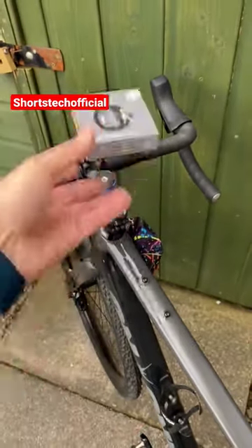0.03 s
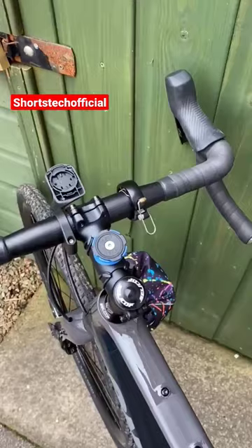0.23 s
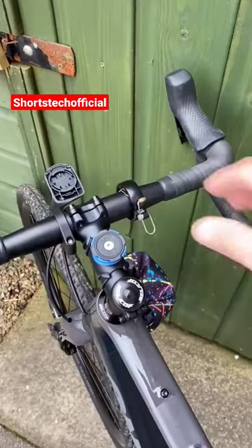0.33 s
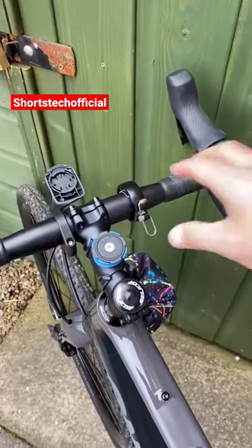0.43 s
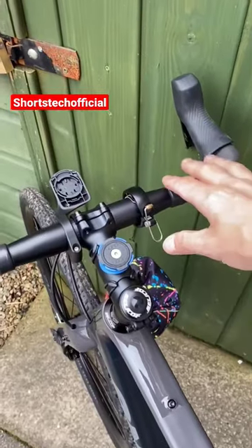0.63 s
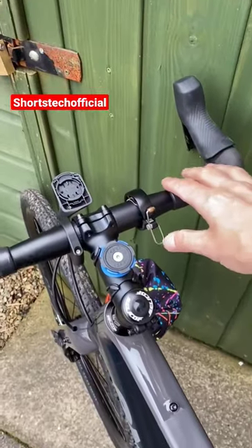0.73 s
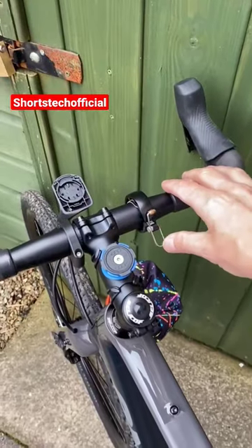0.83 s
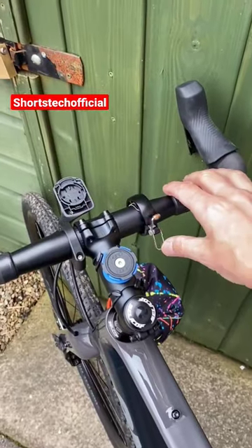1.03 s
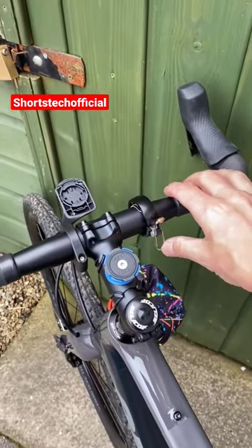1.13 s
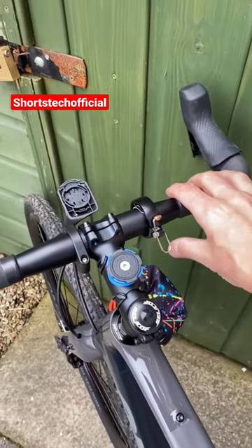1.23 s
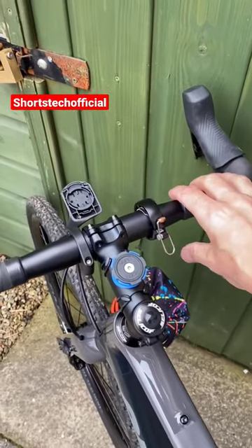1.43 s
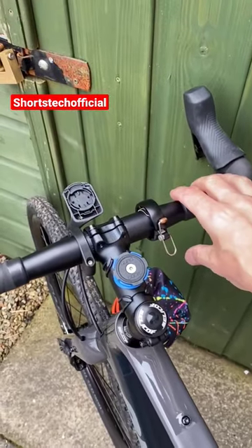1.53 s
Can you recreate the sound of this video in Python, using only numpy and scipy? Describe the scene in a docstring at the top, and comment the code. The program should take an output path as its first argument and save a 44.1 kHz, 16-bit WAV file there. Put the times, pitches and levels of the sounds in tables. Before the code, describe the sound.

A small bicycle bell rings once outdoors, over a faint, steady rumble. First, soft low bumps and sleeve rustle touch the microphone, ending in a hard, hollow knock close by at about 0.2 seconds. A quiet second follows, with a hand barely brushing the handlebar. At about 1.3 seconds the bell's hammer strikes with a bright click, and two high, pure tones ring on to the end.

```python
"""A bicycle by a wooden shed, over a faint, steady outdoor rumble.
0-0.2 s: the camera is jostled; low bumps, sleeve rustle. 0.22 s: a hard, hollow knock close by.
0.4-1.1 s: a hand faintly brushes the handlebar tape.
1.28 s: a thumb releases the bell's sprung hammer. It clacks on the small metal ring,
which sings on in two high, pure tones while its other modes fade."""
import sys
import numpy as np
from scipy import signal
from scipy.fft import rfft, irfft, next_fast_len
from scipy.io import wavfile
from scipy.ndimage import map_coordinates

SR = 44100
rng = np.random.default_rng(int(sys.argv[2]) if len(sys.argv) > 2 else 0)


def put_to_file(sound):
    """Save the sound as 16-bit audio at rate SR, in the file named by the first command-line argument."""
    columns = np.atleast_2d(sound).T  # one column per channel
    safe = np.clip(columns, -1, 1)
    whole_steps = np.round(safe * 32767)
    wavfile.write(sys.argv[1], SR, whole_steps.astype(np.int16))


N = 70560

# outdoor rumble: f/Hz, relative level/dB
AIR_SPECTRUM = [(25, -13), (55, -1), (108, -6.5), (178, -15.5), (325, -16), (380, -10.5), (469, -20),
                (1000, -20), (1600, -32.5), (2400, -49.5), (3300, -49.5), (9750, -60.5), (13000, -69)]
# rumble, left-right likeness: f/Hz, coherence
AIR_COHERENCE = [(60, 1), (130, 1), (280, .8), (590, .45), (1270, .4), (2740, .3), (6000, .05)]
# rumble balance: f/Hz, L-R/dB
AIR_PAN = [(60, -1), (200, 4), (600, 4.5), (2000, 1), (6000, -1)]
# impacts and rustle, left-right likeness: f/Hz, coherence
NEAR_COHERENCE = [(200, 0.31), (600, .6), (1300, -0.25), (3000, 0.52), (6000, 0.85), (12000, -0.36)]
# camera bumps: t/s, level/dB, f/Hz, half-width/s
CAMERA_BUMPS = [(0.031, -46, 58, 0.021), (.058, -41.5, 119, 0.0093), (.092, -34, 66, 0.016),
                (0.133, -40.5, 137, 0.0062), (0.143, -34, 68, 0.011), (.178, -43.5, 52, .02),
                (1.255, -50, 52, 0.038)]
# sleeve rustle: f/Hz, relative level/dB
SLEEVE_SPECTRUM = [(100, 0), (450, 5.5), (900, -4.5), (2500, -13), (3500, -32), (8000, -40.5), (13000, -54)]
# hand on bar tape: t/s, level/dB, f/Hz, half-width/s
TAPE_BRUSHES = [(0.396, -82, 3500, .015), (0.717, -84.5, 8600, 0.038), (0.98, -86, 3600, 0.005),
                (1.121, -92, 5440, 0.0074)]
# knock contacts: t/s, relative level/dB
KNOCK_CONTACTS = [(.2177, -3), (.2211, 0), (.2245, -5)]
# crack of a knock contact: f/Hz, relative level/dB
CRACK_SPECTRUM = [(150, -19), (500, -5.5), (2000, -1), (3600, -2.5), (4700, -17.5), (6000, -1), (8000, -8),
                  (10800, -7.5), (12000, -25), (13000, -29)]
# knocked body: f/Hz, relative level/dB, T60/s, L-R/dB
BODY_MODES = [(190, -21, .08, 4), (325, -11, .045, 3), (385, -13, .05, 3), (526, -10, .06, 8),
              (785, -10, .045, 8), (1122, -5, .05, 3), (1325, -5, .045, 2), (1624, -5, .035, 1),
              (1804, 1, .032, 0), (2006, -7, .035, 0), (2243, 0, .032, 0), (2388, -5, .032, 0),
              (2626, -1.5, .032, -1), (2980, -10, .035, -2), (3260, -9, .035, -3), (3770, -9, .035, -3)]
# wall reflections: f/Hz, relative level/dB
WALL_SPECTRUM = [(35, -42.5), (60, -12.5), (290, -7), (893, -7.5), (1120, -4.5), (1250, -6.5), (2690, -11),
                 (10400, -34), (13000, -48.5)]
# hammer, spring and mount modes: f/Hz, level/dB, T60/s
SPRING_MODES = [(172, -50, 1.0), (211, -41, .14), (400, -44, .14), (555, -39, .1), (1058, -41, .07),
                (1918, -38, .07), (3200, -46, .09), (5090, -36, .07), (5387, -38, .05), (6143, -42, .13),
                (6705, -38, .13), (7712, -40, .12), (8320, -45, .12), (10232, -41, .07), (10930, -40, .06)]
# hammer release, slip, blow, rebound: t/s, level/dB
HAMMER_CONTACTS = [(1.2762, -44), (1.2795, -35), (1.281, -16), (1.2918, -32)]
# click of a hammer contact: f/Hz, relative level/dB
CLICK_SPECTRUM = [(500, -14), (2000, -10), (3800, -41), (5200, -4), (6800, 5), (8500, -3), (11000, -6),
                  (12400, -8.5), (13200, -24)]
# dense ring of spring and mount: f/Hz, relative level/dB
MOUNT_SPECTRUM = [(60, -32.5), (200, -4.5), (330, -10), (550, 3), (1050, -2.5), (1450, -10), (1950, 4),
                  (2800, -25.5), (3700, -3.5), (4600, -10), (7000, -13.5), (10000, -15.5), (11800, -25),
                  (13000, -13.5)]
# decay of that ring: f/Hz, T60/s
MOUNT_DECAY = [(180, 0.41), (600, 0.1), (1800, 0.099), (4000, .1), (8500, 0.16), (12000, 0.088)]
# bell ring: f/Hz, level/dB, T60/s, L-R/dB
BELL_MODES = [(2430.5, -26.2, 60, -4.2), (5835.3, -36.1, 40, -2.3), (6363.5, -21, .19, 0),
              (6363, -41, .85, 0), (12416, -28, .68, 0), (12430, -18.5, .055, 0), (8263, -62, 1.8, 0),
              (8096, -56, .3, 0), (8624, -55, .3, 0)]

KNOCK_S, STRIKE_S, BELL_RISE_S = KNOCK_CONTACTS[0][0], 1.281, 0.0012
TIME_S = np.arange(N) / SR
SIDES = np.array([[0.5], [-0.5]])  # splits an L-R difference


def amp(db):
    """dB to gain."""
    return 10 ** (np.asarray(db) / 20)


def unit(x):
    """Scale to rms 1."""
    return x / np.sqrt(np.mean(x ** 2) + 1e-20)


def along(points, hz):
    """Interpolate (f/Hz, value) on a log axis."""
    f, v = np.transpose(points)
    return np.interp(np.log(hz + 1), np.log(f + 1), v)


def since(start_s):
    """Seconds since start_s, zero before."""
    return np.maximum(TIME_S - start_s, 0)


def fade(t, t60_s):
    """Exponential decay, 60 dB in t60_s."""
    return np.exp(-np.log(1000) * t / t60_s)


def struck(t, rise_s, t60_s):
    """Quick rise, exponential decay."""
    return (1 - np.exp(-t / rise_s)) * fade(t, t60_s)


def swell(peak_s, half_width_s):
    """Gaussian envelope."""
    return np.exp(-((TIME_S - peak_s) / half_width_s) ** 2)


def wobble(rate_hz):
    """Smooth random curve, knots at rate_hz."""
    return map_coordinates(rng.standard_normal(256), [TIME_S * rate_hz], mode="mirror")


def filtered(x, response):
    """Apply a frequency response."""
    size = next_fast_len(N + SR // 2)
    return irfft(rfft(x, size) * response(np.fft.rfftfreq(size, 1 / SR)), size)[..., :N]


def noise(spectrum, coherence=NEAR_COHERENCE):
    """Coloured stereo noise, rms 1."""
    def response(hz):
        angle = np.arccos(np.clip(along(coherence, hz), -1, 1)) / 2
        return amp(along(spectrum, hz)) * [np.cos(angle), np.sin(angle)]
    mid, side = filtered(rng.standard_normal((2, N)), response)
    return unit(np.array([mid + side, mid - side]))


def mode(t, hz, rise_s, t60_s, spread_rad):
    """Damped sine; random phase, scattered between left and right."""
    phase = rng.uniform(0, 2 * np.pi) + spread_rad * rng.standard_normal() * SIDES
    return struck(t, rise_s, t60_s) * np.sin(2 * np.pi * hz * t + phase)


def outdoors(level_db=-57, left_lead_s=0.00045):
    """Steady distant rumble from the left, nearly mono in the bass."""
    def placed(hz):
        return amp(SIDES * along(AIR_PAN, hz)) * np.exp(2j * np.pi * hz * SIDES * left_lead_s)
    return amp(level_db) * filtered(noise(AIR_SPECTRUM, AIR_COHERENCE), placed)


def brushes(relative_width=0.22):
    """Hand settling on the bar tape: faint, narrow hisses."""
    def hiss(centre_hz):
        white = rng.standard_normal((2, N))
        return unit(filtered(white, lambda hz: np.exp(-((hz / centre_hz - 1) / relative_width) ** 2 / 2)))
    return sum(amp(db) * swell(s, width_s) * hiss(hz) for s, db, hz, width_s in TAPE_BRUSHES)


def handling(rustle_db=-61, rustle_tau_s=0.014):
    """Soft, low bumps on the camera; sleeve rustle that ends with the knock."""
    bumps = sum(amp(db) * swell(s, width_s) * np.sin(2 * np.pi * hz * (s - TIME_S))
                for s, db, hz, width_s in CAMERA_BUMPS)
    rustle = amp(rustle_db) * noise(SLEEVE_SPECTRUM) * np.exp(-since(KNOCK_S) / rustle_tau_s)
    return bumps + rustle


def knock(crack_db=-18, body_db=-8, wall_db=-20, body_s=0.2203, cut_s=0.2615, cut_tau_s=0.0046):
    """Three cracks; the main one rings the hollow body. Walls reflect; all stops short."""
    contacts = sum(amp(crack_db + db) * struck(since(s), rise_s=0.00026, t60_s=0.035)
                   for s, db in KNOCK_CONTACTS)
    cracks = contacts * noise(CRACK_SPECTRUM)
    t = since(body_s)
    body = sum(amp(body_db + db + SIDES * pan_db) * mode(t, hz, 0.0014, t60_s, spread_rad=0.78)
               for hz, db, t60_s, pan_db in BODY_MODES)
    walls = amp(wall_db) * struck(since(KNOCK_S), rise_s=0.0018, t60_s=0.13) * noise(WALL_SPECTRUM)
    return (cracks + body + walls) * np.exp(-since(cut_s) / cut_tau_s)


def spring(coil_modes=36, coil_hz=(7860, 9500), coil_db=-49.5, coil_t60_s=0.26, spread_rad=0.37):
    """The blow rings hammer, handlebar mount and the coil spring's crowded high modes."""
    t = since(STRIKE_S)
    clank = sum(amp(db) * mode(t, hz, BELL_RISE_S, t60_s, spread_rad) for hz, db, t60_s in SPRING_MODES)
    shimmer = sum(mode(t, hz, BELL_RISE_S, coil_t60_s, spread_rad)
                  for hz in rng.uniform(*coil_hz, coil_modes))
    return clank + amp(coil_db) * shimmer / np.sqrt(coil_modes)


def hammer(mount_db=-29.5, mount_rise_s=0.0046):
    """Bright contact clicks, then the dense, short ring of spring and mount."""
    contacts = sum(amp(db) * struck(since(s), rise_s=0.00012, t60_s=0.019) for s, db in HAMMER_CONTACTS)
    clicks = contacts * noise(CLICK_SPECTRUM)
    hz, frame_s, bands = signal.stft(noise(MOUNT_SPECTRUM), SR, nperseg=256)
    decay = fade(np.maximum(frame_s - STRIKE_S, 0), along(MOUNT_DECAY, hz)[:, None])
    ring = signal.istft(bands * decay, SR, nperseg=256)[1][:, :N]
    onset = 1 - np.exp(-since(STRIKE_S) / mount_rise_s)
    return clicks + amp(mount_db) * ring * onset


def bell(left_lead_s=0.000191, waver_db=0.46):
    """One blow starts all modes of the ring. Each wavers slightly; the two lowest hardly fade."""
    t = np.array([since(STRIKE_S), since(STRIKE_S + left_lead_s)])
    ring = np.zeros((2, N))
    for hz, db, t60_s, pan_db in BELL_MODES:
        gain = amp(db + SIDES * pan_db - waver_db * wobble(rate_hz=13.2))
        ring += gain * struck(t, BELL_RISE_S, t60_s) * np.sin(2 * np.pi * hz * t)
    return ring


def scene():
    """Stereo sum of all sources."""
    return bell() + hammer() + spring() + knock() + handling() + brushes() + outdoors()


def record(dry, lift_db=4.5, knee_db=-38.5, tau_s=0.0037, low_hz=38, top_hz=13200):
    """Camera: lifts quiet moments, rounds off peaks, limits the band."""
    pole = np.exp(-1 / (tau_s * SR))
    sidechain = filtered(dry, lambda hz: hz / (hz + 500))
    power = signal.lfilter([1 - pole], [1, -pole], np.mean(sidechain ** 2, axis=0))
    lifted = dry * amp(lift_db / (1 + power / amp(knee_db) ** 2))
    limited = lifted / (1 + lifted ** 8) ** (1 / 8)
    return filtered(limited, lambda hz: hz ** 8 / (hz ** 8 + low_hz ** 8) / (1 + (hz / top_hz) ** 90))


dry = scene()
out = record(dry)
put_to_file(out)
```